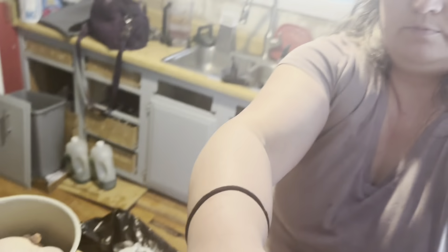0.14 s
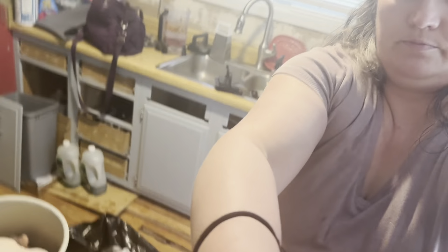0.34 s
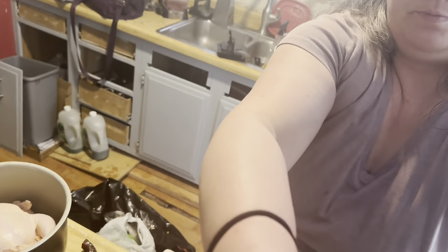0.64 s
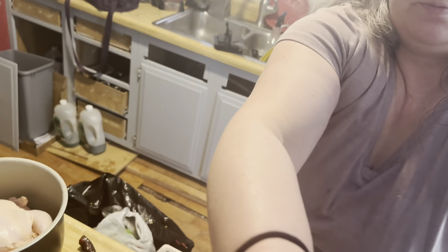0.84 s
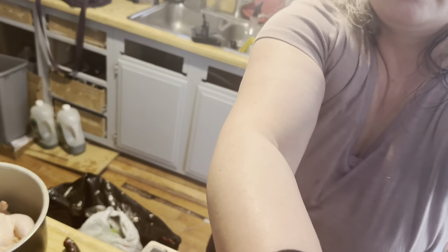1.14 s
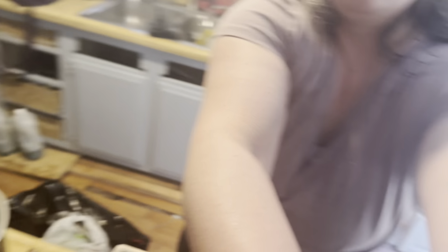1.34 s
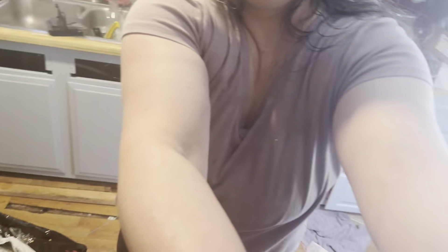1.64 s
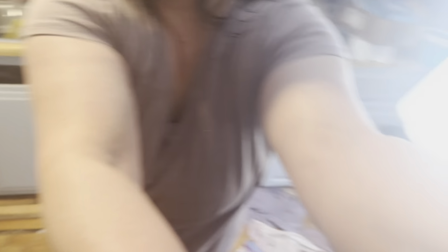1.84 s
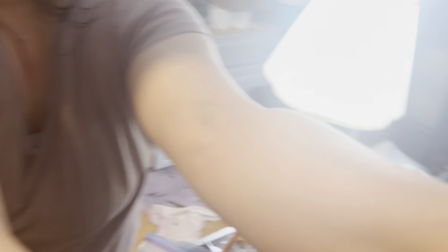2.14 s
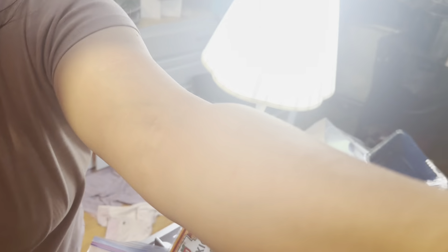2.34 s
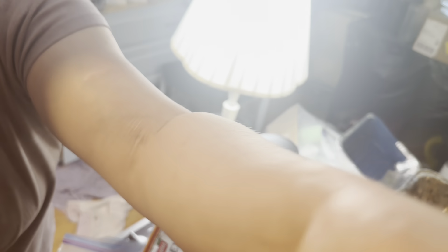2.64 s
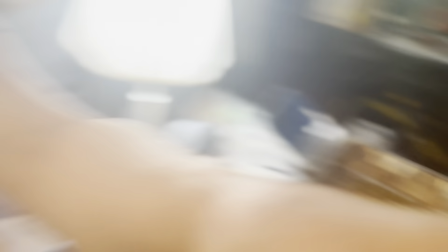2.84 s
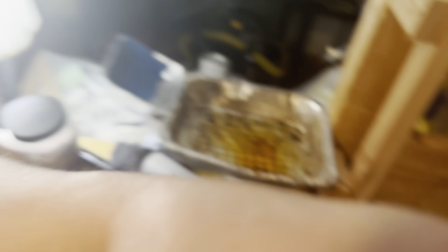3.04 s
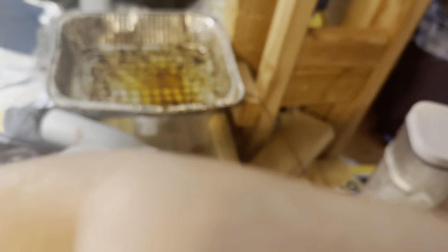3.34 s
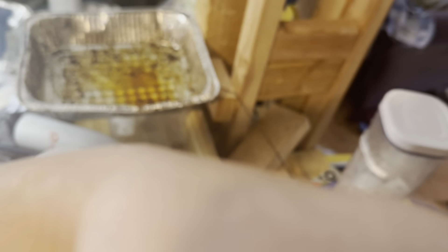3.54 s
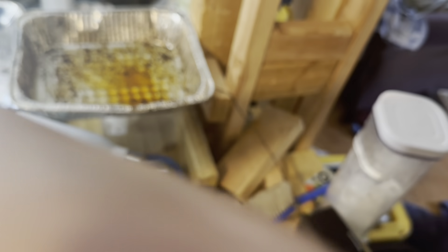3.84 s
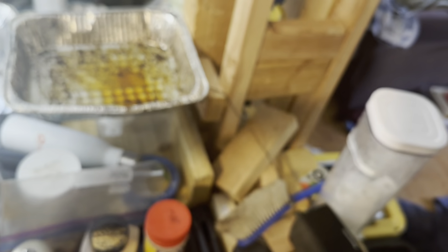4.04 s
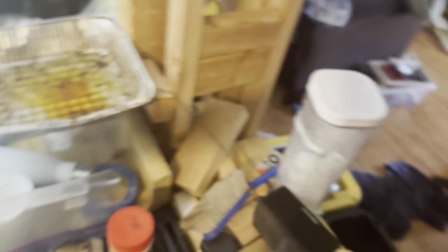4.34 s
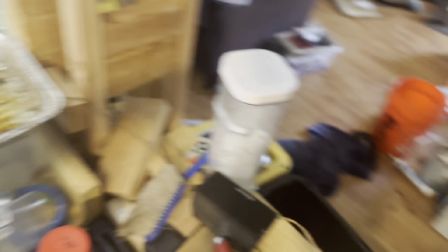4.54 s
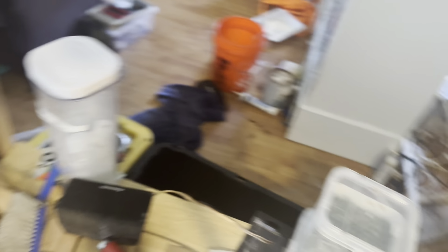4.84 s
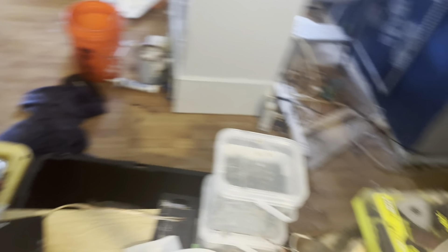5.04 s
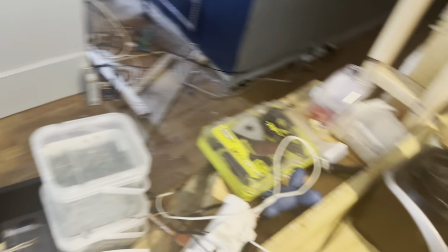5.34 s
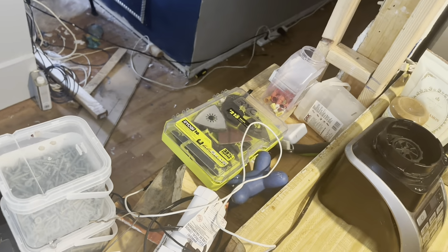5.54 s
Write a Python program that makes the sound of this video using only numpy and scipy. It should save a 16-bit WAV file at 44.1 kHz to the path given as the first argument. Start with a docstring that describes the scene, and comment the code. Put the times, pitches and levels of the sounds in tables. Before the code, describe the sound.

Very close stereo handling in a small quiet kitchen. A bright crackle opens, then a hard hollow knock and a run of smaller bumps on the microphone casing. After a sparse stretch, tiny quick ticks lead to a stem snap. More dry cracks follow, the sharpest just after three seconds with a short rattle, then a strong knock and snap past four with a faint bowl hum, and soft bumps near the end.

```python
"""Snapping dry chili pods

Dry chili pods are handled close to a hand-held two-port microphone in a quiet kitchen.
Stems snap as bright noise bursts with a room tail; one short run of ringing ticks comes before a snap.
Knocks are decaying sines, skins rustle and creak as coloured noise with moving levels,
and rattles are noise in narrow resonances. The grip rumbles, a metal bowl hums faintly
around a few knocks, and the room hisses below."""
import sys
import numpy as np
from scipy import signal
from scipy.fft import rfft, irfft, next_fast_len
from scipy.io import wavfile

SR = 44100
rng = np.random.default_rng(int(sys.argv[2]) if len(sys.argv) > 2 else 0)


def pcm_store(signal):
    """Save signal as 16-bit PCM."""
    levels = np.round(np.clip(np.atleast_2d(signal), -1, 1) * 32767)
    wavfile.write(sys.argv[1], SR, levels.astype(np.int16).T)


N = 250488
SIZE = next_fast_len(N + 4096)   # FFT length
HZ = np.maximum(np.fft.rfftfreq(SIZE, 1 / SR), 1)   # FFT bins, kept above 0 for the logarithm

# Noise colours shared by several sources: (frequency [Hz], relative density [dB])
# lumpy low creak of skins and grip
CREAK_COLOUR = [(110, -2), (170, 6.5), (260, 4), (400, 1), (600, -13), (900, -17.5), (1400, -65.5)]
# body of snaps and rustle
MIDDLE_COLOUR = [(700, 3.5), (1200, 0), (2500, -2.5), (3800, -6), (4500, -9.5), (6000, -34)]
# main crackle of snaps and rustle
TREBLE_COLOUR = [(2200, 2), (3500, -1), (7000, 7), (9500, -1.5), (11000, -9.5), (12500, -25.5)]
# highest crackle of snaps and rustle
TOP_COLOUR = [(9000, -12), (11000, 1), (13500, 2), (15500, 3.5), (16500, -33), (17500, 0.5)]
# the room tail, also the noise that feeds the rattles
WALL_COLOUR = [(500, -19.5), (1200, -1), (9000, -12.5), (16000, -31)]


def from_db(db):
    """Decibels to gain."""
    return 10 ** (np.asarray(db) / 20)


def rms_one(x):
    """Scale to rms 1."""
    return x / np.sqrt(np.mean(x ** 2) + 1e-20)


def in_time(rows):
    """Draw straight lines between the points of a time curve, one array per column after the time."""
    times, *columns = np.transpose(rows)
    return [np.interp(np.arange(N) / SR, times, column) for column in columns]


def at_hz(points):
    """Read a frequency curve at every FFT bin, straight between points on a log-frequency axis."""
    hz, values = np.array(points).T
    return np.interp(np.log(HZ), np.log(hz), values)


def drift(rate_hz):
    """Random wander of rms 1: white noise through a two-pole low-pass near rate_hz."""
    warm_up = 20000   # samples dropped while the filter settles
    r = np.exp(-2 * np.pi * rate_hz / SR)
    wander = signal.lfilter([1], [1, -2 * r, r * r], rng.standard_normal(N + warm_up))
    return rms_one(wander[warm_up:])


def noise(colour, alike_boost=0.0):
    """Coloured stereo noise of rms 1, its left-right likeness set by frequency."""
    # likeness of the two sides before any boost: (frequency [Hz], correlation [0 to 1])
    likeness = [(60, .975), (125, .93), (250, .9), (700, .3), (1500, .4), (3000, .6), (6500, .6),
                (9000, .85), (10500, .99), (16000, .99)]
    mid, side = rfft(rng.standard_normal((2, SIZE)))
    alike = np.clip(at_hz(likeness) + alike_boost, 0, 1)
    pair = np.sqrt(1 + alike) * mid + np.sqrt(1 - alike) * side * [[1], [-1]]
    return rms_one(irfft(pair * from_db(at_hz(colour)), SIZE)[:, :N])


def dying(t60, length_s):
    """Exponential decay that falls 60 dB in t60 seconds."""
    t = np.arange(int(length_s * SR)) / SR
    return from_db(-60 * t / max(t60, .001))


def sine(hz, t):
    """A sine starting at phase zero."""
    return np.sin(2 * np.pi * hz * t)


def add(out, s, sound):
    """Mix a sound in from time s, cut at the end of the scene."""
    i = round(s * SR)
    out[..., i:i + sound.shape[-1]] += sound[..., :N - i]


def air():
    """Steady room hiss: coloured noise at a constant level."""
    # (frequency [Hz], relative density [dB])
    air_colour = [(180, -29.5), (300, -4), (1200, -18), (1700, -33), (2200, -29.5), (5400, -62),
                  (7200, -29.5), (9500, -48), (14700, -47), (16500, -38)]
    return from_db(-70) * noise(air_colour)


def grip():
    """Muscle rumble and lumpy creaks carried through the casing; a tighter grip raises both."""
    # tension of the grip, as its rumble before the wander: (time [s], level [dB])
    tension = [(0.0, -51), (0.19, -48), (0.24, -29), (0.3, -43.5), (0.54, -43), (0.62, -50.5), (0.77, -36),
               (0.87, -53), (1.12, -46), (1.3, -49), (2.15, -51), (2.3, -57), (2.5, -53.5), (3.55, -52.5),
               (3.63, -70.5), (4.0, -58), (4.68, -56.5), (5.13, -49.5), (5.68, -49)]
    # (frequency [Hz], relative density [dB])
    rumble_colour = [(15, -52), (25, -12.5), (70, -0.5), (111, -6.5), (145, -13.5), (177, -19.5),
                     (220, -17), (290, -62.5), (480, -120)]
    creak_mean_db, creak_follows = -62.5, 0.76   # level at mean tension; share of the tension's swing
    rumble_db, = in_time(tension)
    creak_db = creak_mean_db + creak_follows * (rumble_db - rumble_db.mean())
    rumble = from_db(rumble_db + 3.2 * drift(12.0)) * noise(rumble_colour)
    creak = from_db(creak_db + 1.38 * drift(27)) * noise(CREAK_COLOUR)
    return rumble + creak


def rustle():
    """Rubbing strokes as noise in four bands whose level flickers fast, over a smoother swish."""
    # rubbing strokes before the flicker: (time [s], length [s], fade t60 [s],
    # creak level [dB], middle level [dB], treble level [dB], top level [dB])
    strokes = [ (0.0, 0.022, 0.22, -73, -44, -60, -86), (0.486, 0.071, 0.033, -47.5, -69, -69.5, -70),
               (0.698, 0.08, 0.068, -45, -66.5, -75, -67.5), (1.299, 0.03, 0.14, -57.5, -65, -65, -74),
               (1.67, 0.025, 0.3, -62, -66.5, -57.5, -81), (1.86, 0.032, 0.085, -63, -105, -84.5, -81),
               (2.039, 0.053, 0.077, -72, -100, -82, -79), (2.331, 0.057, 0.064, -73, -71.5, -75.5, -68),
               (2.413, 0.012, 0.24, -79, -67, -75, -74), (2.547, 0.072, 0.19, -68, -84, -87, -77),
               (2.672, 0.023, 0.081, -87, -72.5, -69.5, -85), (2.794, 0.13, 0.1, -60, -65, -65, -64.5),
               (3.691, 0.017, 0.044, -70, -89, -86, -73), (3.742, 0.023, 0.052, -57, -59, -59.5, -57),
               (3.841, 0.004, 0.17, -85, -100, -66, -58.5), (4.522, 0.06, 0.051, -62.5, -86, -82, -81),
               (5.024, 0.061, 0.11, -82, -98, -77.5, -82), (5.101, 0.064, 0.49, -54.5, -69.5, -71, -72.5),
               (5.397, 0.014, 0.025, -77, -74, -84, -77), ]
    # soft swish of hands and cloth between the strokes: (time [s], level [dB])
    swish_curve = [(0.0, -56.5), (0.11, -70.5), (0.54, -79.5), (1.42, -77.5), (1.69, -78.5), (1.96, -78),
                   (3.11, -72.5), (3.37, -85.5), (3.8, -71), (3.94, -82.5), (5.22, -75), (5.39, -83.5),
                   (5.68, -80.5)]
    # the swish in each band: middle, treble and top, relative level [dB]
    swish_bands_db = [0.5, -7, -8.5]
    stroke_rise, flicker_db = 0.32, 1.5   # share of a stroke's length spent swelling; depth of the 350 Hz part
    levels, t = np.zeros((4, N)), np.arange(SR // 2) / SR
    for s, length_s, t60, *bands_db in strokes:
        swell = np.minimum(t / (stroke_rise * length_s), 1) ** 2
        fade = from_db(-60 * np.maximum(t - length_s, 0) / t60)
        add(levels, s, from_db(bands_db)[:, None] * swell * fade)
    levels *= from_db(flicker_db * (drift(350) + 1.04 * drift(40)))
    swish_db = np.add.outer(swish_bands_db, in_time(swish_curve)[0])
    levels[1:] += from_db(swish_db + 1.5 * drift(8))   # no swish in the creak band
    colours = (CREAK_COLOUR, MIDDLE_COLOUR, TREBLE_COLOUR, TOP_COLOUR)
    return sum(level * noise(colour) for level, colour in zip(levels, colours))


def bowl():
    """A struck metal bowl: two long thin sine modes, cut after one second."""
    # modes of the bowl: (frequency [Hz], level [dB], t60 [s])
    bowl_modes = [(750, -75, 0.6), (968, -71.5, 2.0)]
    # when it sounds: (time [s], relative level [dB])
    bowl_hits = [(3.235, -3), (4.322, 5), (5.116, -4.5)]
    out, t = np.zeros(N), np.arange(SR) / SR
    for s, db in bowl_hits:
        hum = sum(from_db(db + mode_db) * sine(hz, t) * dying(t60, 1) for hz, mode_db, t60 in bowl_modes)
        add(out, s, hum)
    return out


def rattles():
    """Dry rattles that linger: noise held in narrow cavity resonances, dying away."""
    # resonances: (frequency [Hz], width of each filter pass [Hz], relative level [dB], t60 [s])
    cavities = [(2630, 580, -2, 0.25), (4350, 350, -0.5, 0.25), (6870, 760, 2, 0.27),
                (8250, 570, -4, 0.093)]
    # (time [s], level [dB], tilt above the first cavity [dB per octave])
    rattle_events = [(0.221, -60.5, 0.5), (0.453, -69, -8), (0.513, -79, -7), (0.715, -76.5, -2.5),
                     (0.75, -66.5, -1), (1.154, -74.5, -3), (1.309, -83, 2), (1.6, -73, -7),
                     (1.684, -61.5, 2), (2.717, -74, -7.5), (3.16, -56, -2.5), (3.234, -56, -1),
                     (4.212, -74, 1.5), (4.324, -78, 0.5), (5.156, -73.5, -3.5)]
    ping_db, ping_t60_s = 5.5, 0.055   # a louder first moment, relative to the lingering part
    out, broad = 0, noise(WALL_COLOUR)
    first_hz = cavities[0][0]
    for hz, width_hz, cavity_db, t60 in cavities:
        level = np.zeros(N)
        shape = dying(t60, .5) + from_db(ping_db) * dying(ping_t60_s, .5)
        for s, db, tilt_db in rattle_events:
            add(level, s, from_db(db + cavity_db + tilt_db * np.log2(hz / first_hz)) * shape)
        peak = signal.iirpeak(hz, hz / width_hz, SR)
        narrow = signal.lfilter(*peak, signal.lfilter(*peak, broad))
        out = out + level * rms_one(narrow)
    return out


def knocks():
    """The casing rings a few cycles; the hand answers with a slower boom."""
    # knocks on the casing: (time [s], level [dB], main pitch [Hz],
    # low boom before its common boost, relative level [dB], overtones relative level [dB])
    knock_events = [(0.222, -13, 379.4, -9, -22), (0.251, -29.5, 403, -21, -33),
                    (0.293, -38, 413, -31, -26), (0.305, -32, 390, -29, -32),
                    (0.37, -26.5, 368, -36, -28.5), (0.452, -18.5, 385.5, -43, -23),
                    (0.512, -33.5, 470, -5, -39), (0.531, -29.5, 386, -9, -36),
                    (0.552, -38.5, 403, -17, -32), (0.71, -36.5, 390, -16, -46),
                    (0.75, -25.5, 370, -18, -28), (0.772, -28.5, 410, -18, -28), (1.182, -43, 404, -5, -20),
                    (1.239, -39, 340, -28, -33), (1.281, -43, 410, -10, -31), (1.603, -45.5, 410, -22, -22),
                    (2.135, -38, 382, -15, -16), (2.423, -34, 426, 3, -25.5),
                    (2.953, -53.5, 390, -18, -1.5), (3.042, -38, 505, -20, -30),
                    (3.046, -39, 240, -10, -37), (3.154, -36, 342, -16, -13.5), (3.162, -33, 433, -26, -17),
                    (3.239, -33.5, 393, -30, -19.5), (4.1, -50.5, 516, 0, -24),
                    (4.198, -29.5, 458, -30, -23), (4.323, -21.5, 378.5, -16, -12.5),
                    (5.115, -34.5, 419, -6, -17.5), (5.16, -42, 386, -3, -15),
                    (5.213, -31, 386, -19, -22.5)]
    # (multiple of the main pitch, level added to the overtones' own [dB], t60 [s])
    overtones = [(1.498, 7, 0.046), (2.05, 15.5, 0.023), (2.898, 19, 0.0088)]
    knock_rise_s, knock_t60_s = 0.00095, 0.032
    boom_hz, boom_rise_s, boom_t60_s, boom_boost_db = 66.4, 0.0086, 0.09, 5.5
    lean_db, lean_hz = 3.5, 450   # left minus right at lean_hz, growing in proportion to frequency
    out, t = np.zeros((2, N)), np.arange(int(.2 * SR)) / SR
    rise = (1 - np.exp(-t / knock_rise_s)) ** 2   # soft contact
    swell = 1 - np.exp(-t / boom_rise_s)   # the hand is heavier and follows late
    boom_shape = from_db(boom_boost_db) * swell * sine(boom_hz, t) * dying(boom_t60_s, .2)
    for s, db, hz, boom_db, over_db in knock_events:
        modes = [(hz, 3, knock_t60_s)]
        modes += [(k * hz, over_db + mode_db, t60) for k, mode_db, t60 in overtones]
        # the two ports feel the casing a little out of step, the left one more
        for side, twist in enumerate((.5, -.5)):
            ring = 0
            for f, mode_db, t60 in modes:
                lean = twist * f / lean_hz   # also the phase lead [rad]
                wave = np.sin(2 * np.pi * f * t + lean)
                ring = ring + from_db(mode_db + lean_db * lean) * wave * dying(t60, .2)
            add(out[side], s, from_db(db) * rise * (ring + from_db(boom_db) * boom_shape))
    return out


def ticks():
    """A stem bent before it breaks slips in quick, nearly regular ticks that grow, ringing its modes."""
    # bends, before a random spread in level: (start [s], end [s], first level [dB], last level [dB])
    bends = [(1.518, 1.597, -71, -53.5)]
    # modes of the stem: (frequency [Hz], relative level [dB], t60 [s])
    stem_modes = [(2600, -9, .004), (3800, -3, .005), (8500, 0, .006)]
    slip_s, slip_jitter = .011, .25   # mean spacing; random shift as a share of it
    out, t = np.zeros(N), np.arange(int(.03 * SR)) / SR
    ring = sum(from_db(db) * sine(hz, t) * dying(t60, .03) for hz, db, t60 in stem_modes)
    for start, end, first_db, last_db in bends:
        for s in np.arange(start, end, slip_s):
            late, uneven = rng.standard_normal(2)
            level_db = np.interp(s, [start, end], [first_db, last_db]) + 2 * uneven
            add(out, s + slip_jitter * slip_s * late, from_db(level_db) * ring)
    return out


def room(x):
    """The room's echo: convolution with dying stereo noise of unit energy per side on average."""
    room_t60_s = 0.17
    tail = rms_one(noise(WALL_COLOUR)[:, :SR // 2] * dying(room_t60_s, .5)) / np.sqrt(SR / 2)
    return signal.fftconvolve(x[None], tail, axes=1)[:, :N]


def snaps():
    """Each break is a burst of bright noise that rings the pod's shell, followed by the room's tail."""
    # (time [s], treble peak level [dB], middle relative level [dB], top relative level [dB], shell pitch [Hz])
    snap_events = [(0.0054, -30.5, -4.5, -13, 1400), (0.0343, -35.5, -5, -20, 1600),
                   (0.064, -42.5, 1.5, -27, 1520), (0.028, -47, -11, -20, 3500),
                   (0.1128, -54.5, -3, -10, 1700), (0.153, -54.5, -17, 1, 1430),
                   (0.194, -50.5, -16, 3, 1570), (0.2191, -37.5, 1.5, 0.5, 2720),
                   (0.2348, -39.5, -7, -23, 4000), (0.449, -43, 4, -2, 2700), (0.469, -56, -10, 0, 1260),
                   (0.7515, -50, 7, 2, 4360), (0.7874, -54.5, -2, 8, 1380), (0.8753, -53, -6, -25, 2160),
                   (1.3006, -56, 4.5, 9, 1230), (1.6001, -42.5, -1, -37, 1300),
                   (1.6317, -58, -8, -23, 1280), (2.131, -35.5, -3.5, -7, 1530),
                   (2.3935, -43, 8.5, 2, 2600), (2.4199, -41.5, -4, -1, 1170),
                   (2.4717, -49.5, -5, -4, 1530), (2.72, -58.5, 5, -22, 1230),
                   (2.803, -66, 16.5, -24, 2160), (2.824, -59, 8, -5, 1730), (2.845, -64, 9, -10, 1800),
                   (2.9084, -43, -7, 6, 2460), (2.959, -65, 12, -6, 2620), (3.042, -44, -1.5, -23, 2240),
                   (3.154, -27.5, -9.5, 1, 2460), (3.1616, -30.5, -8, 3, 2700),
                   (3.2346, -35, -2.5, -0.5, 4500), (3.239, -42.5, 5.5, -12, 1480),
                   (3.7582, -50.5, -1, -1, 2960), (3.8361, -37.5, -47, 11, 2850),
                   (4.194, -40.5, -2.5, 2, 1840), (4.2035, -46.5, 9.5, -28, 1740),
                   (4.2132, -45, 0, 4, 3950), (4.2777, -63.5, 8, 0, 3570), (4.3218, -30.5, 5.5, 1, 1036),
                   (5.1144, -57, 10, -10, 1420), (5.1571, -48.5, 1.5, -15, 3020)]
    rise_s, t60_s, shell_q = 0.00062, 0.0097, 2.2
    top_decay = 0.77   # share of the t60 left in the top band
    room_db, room_follows = -5, 0.43   # share by which the room answers to the middle band
    out, send, size = np.zeros((2, N)), np.zeros(N), int(.05 * SR)
    bands = [noise(colour, alike_boost=0.3) for colour in (MIDDLE_COLOUR, TREBLE_COLOUR, TOP_COLOUR)]
    shape = (1 - np.exp(-np.arange(size) / SR / rise_s)) * dying(t60_s, .05)
    faster = dying(t60_s * top_decay / (1 - min(top_decay, .9)), .05)   # the highest crackle dies first
    for s, db, middle_db, top_db, shell_hz in snap_events:
        i = round(s * SR)
        middle, treble, top = (band[:, i:i + size] * shape for band in bands)
        shell = signal.iirpeak(shell_hz, shell_q, SR)
        middle = signal.lfilter(*shell, signal.lfilter(*shell, middle))
        for burst, level_db in ((middle, middle_db), (treble, 0), (top * faster, top_db)):
            add(out, s, from_db(db + level_db) * burst / np.abs(burst).max())
        add(send, s, from_db(db + room_follows * middle_db + room_db) * shape)
    return out + room(send * rng.standard_normal(N))


def scene():
    """All sources over the room's hiss."""
    background = air() + grip() + rustle()
    return background + bowl() + rattles() + knocks() + ticks() + snaps()


def record(dry):
    """The two ports differ in level and phase by frequency; deep bass and the top are cut."""
    # level of the left port minus the right: (frequency [Hz], level [dB])
    balance = [(60, 0), (150, -1), (380, 0), (950, -0.5), (2380, 1), (5980, 4.5), (15000, -0.5)]
    # phase of the right port: (frequency [Hz], lead [rad])
    right_lead = [(250, 0), (2000, -.7), (5000, -1.2), (7400, -2.4), (8200, -6), (9200, -5.6),
                  (10000, -4.6), (11000, -3.14), (12200, -2.2), (14000, -.1), (16500, .5)]
    low_cut_hz, cutoff_hz = 63, 17100   # at cutoff_hz and above, 60 dB down
    half = from_db(at_hz(balance) / 2)
    ports = np.array([half + 0j, np.exp(1j * at_hz(right_lead)) / half])
    out = irfft(rfft(dry, SIZE) * ports, SIZE)[:, :N]
    out = signal.sosfilt(signal.butter(2, low_cut_hz, "high", fs=SR, output="sos"), out)
    return signal.sosfilt(signal.cheby2(12, 60, cutoff_hz, fs=SR, output="sos"), out)


dry = scene()
out = record(dry)
pcm_store(out)
```